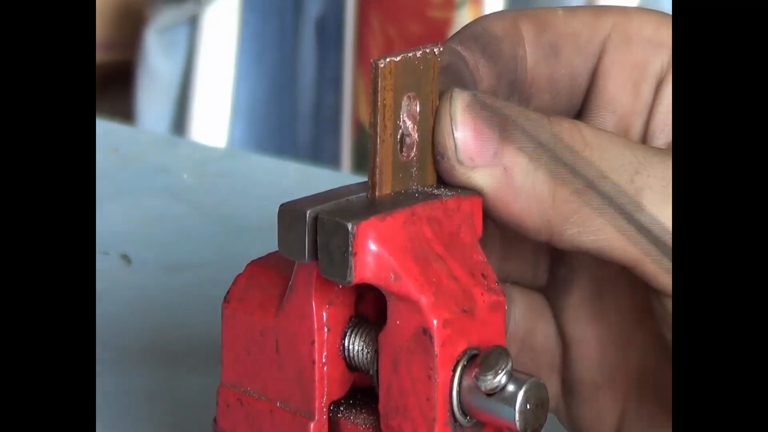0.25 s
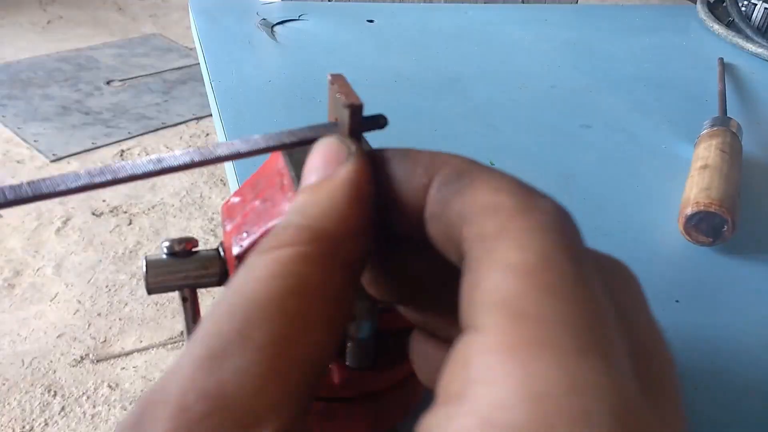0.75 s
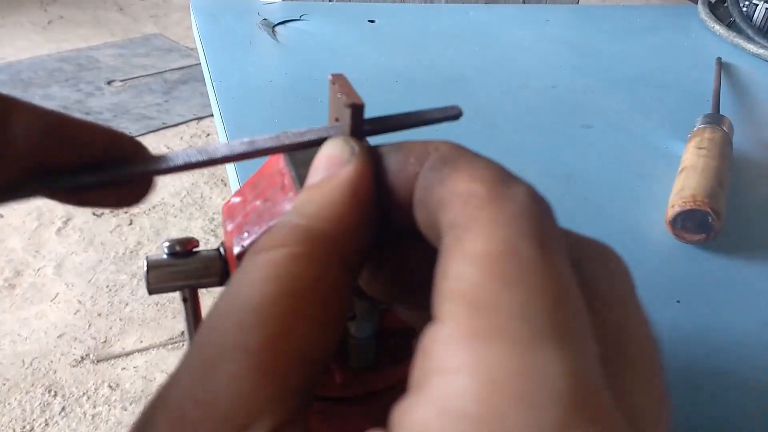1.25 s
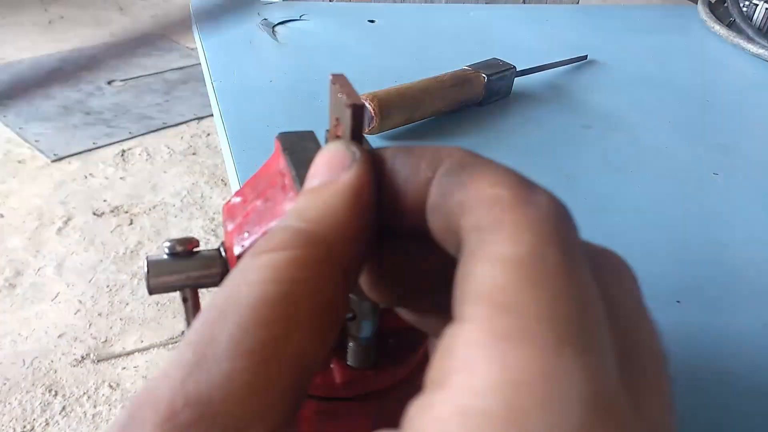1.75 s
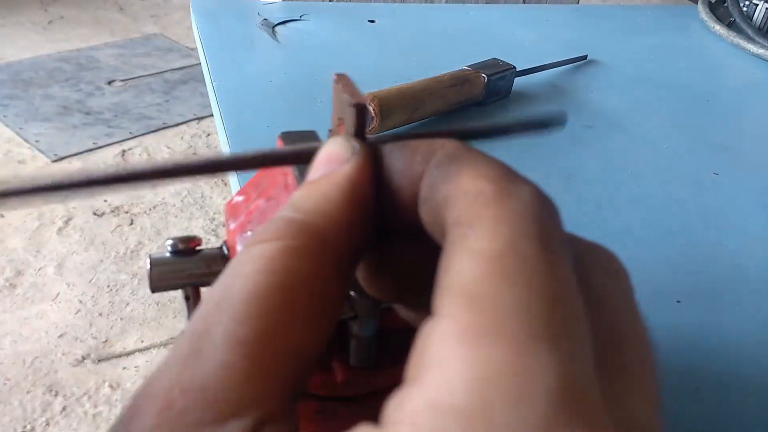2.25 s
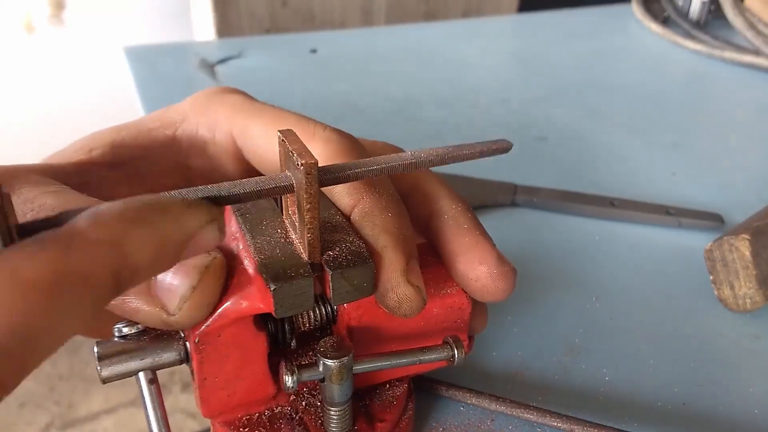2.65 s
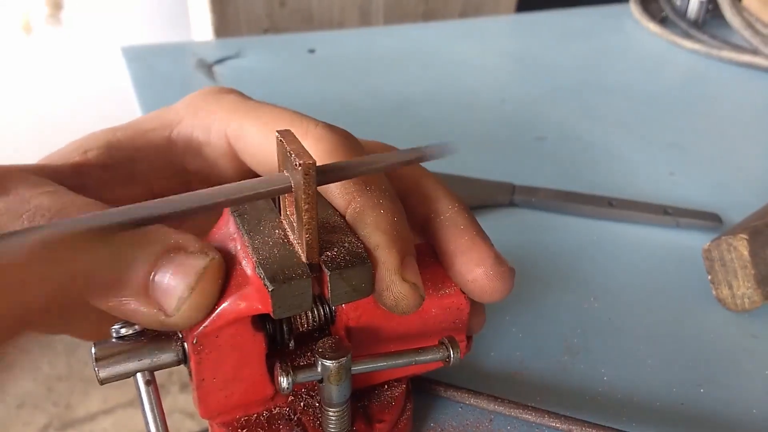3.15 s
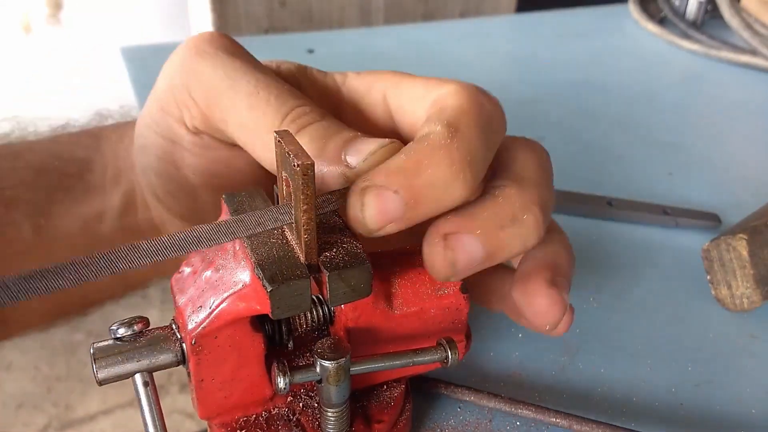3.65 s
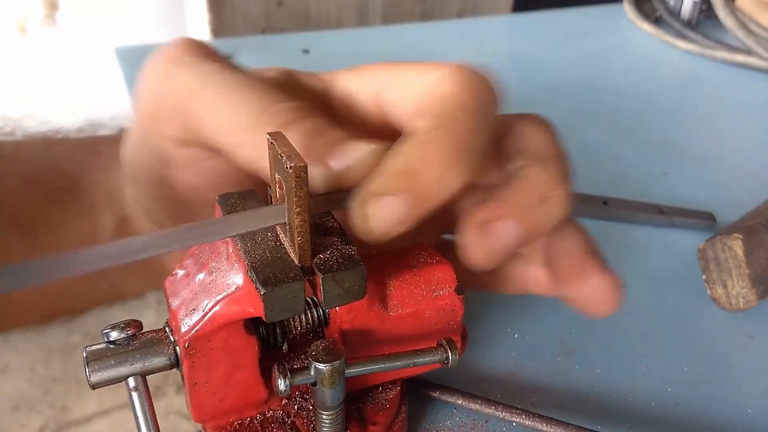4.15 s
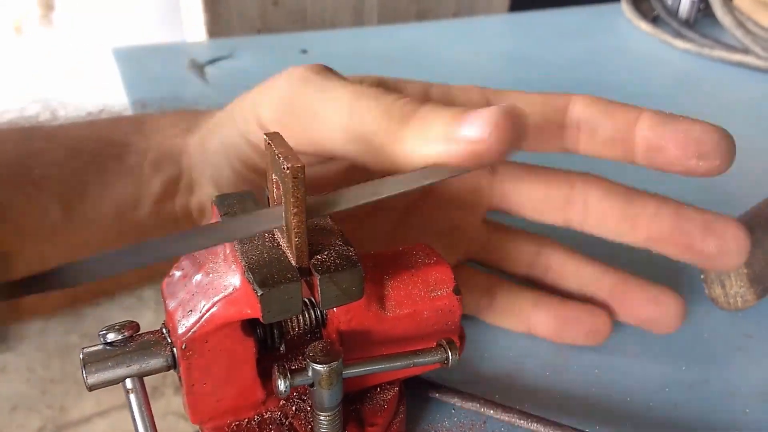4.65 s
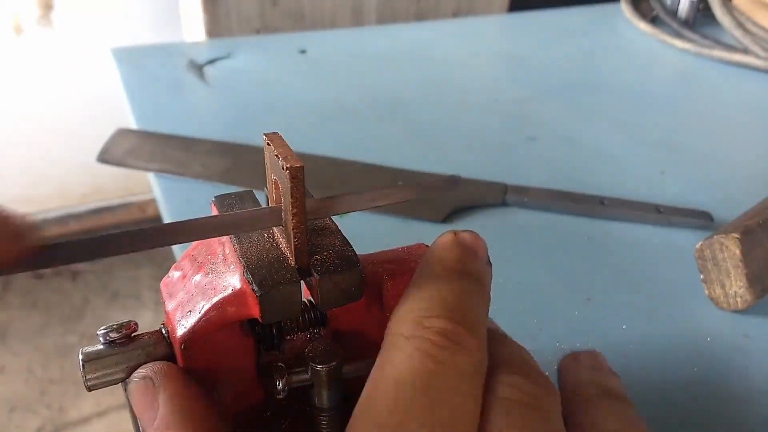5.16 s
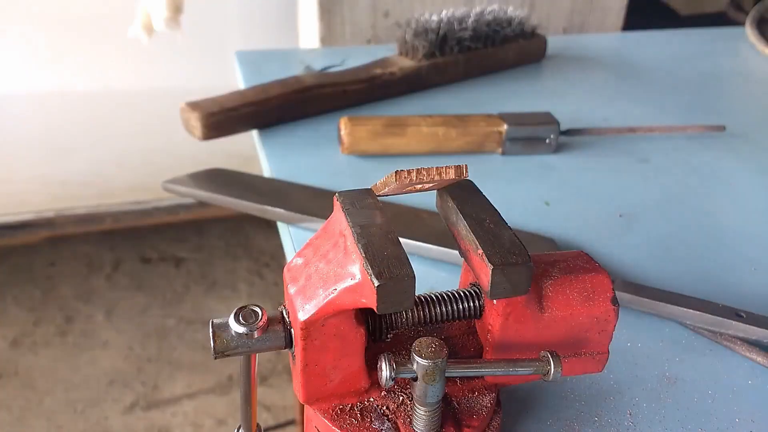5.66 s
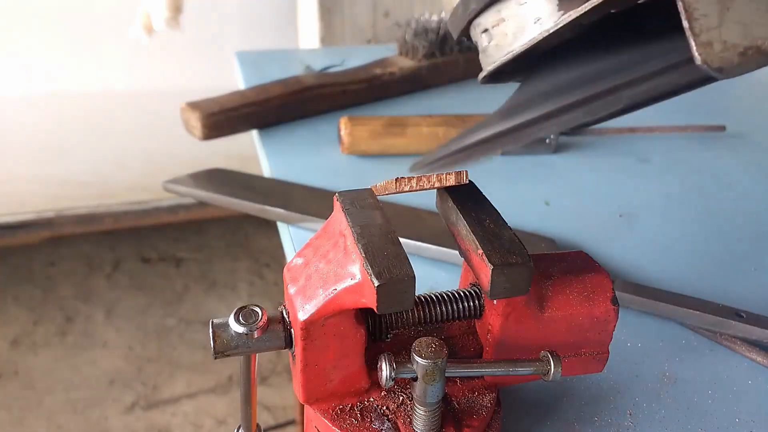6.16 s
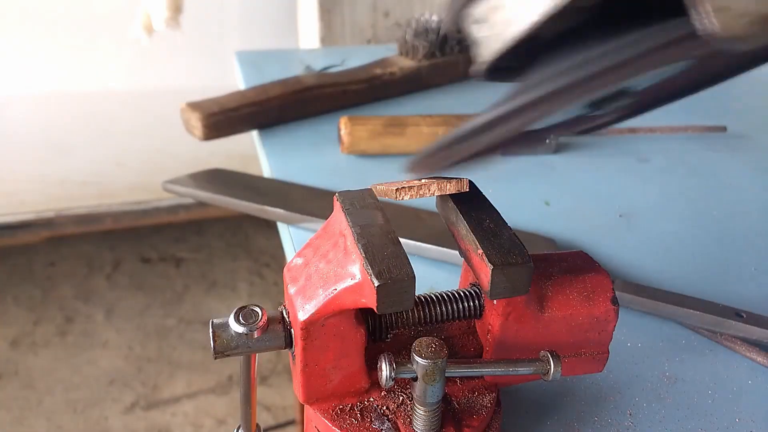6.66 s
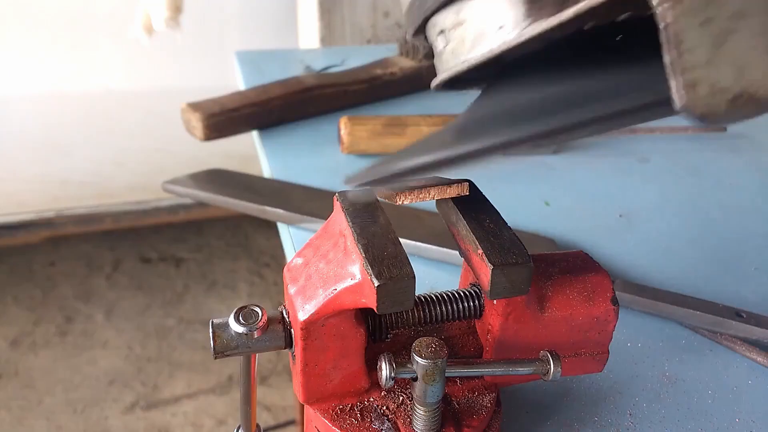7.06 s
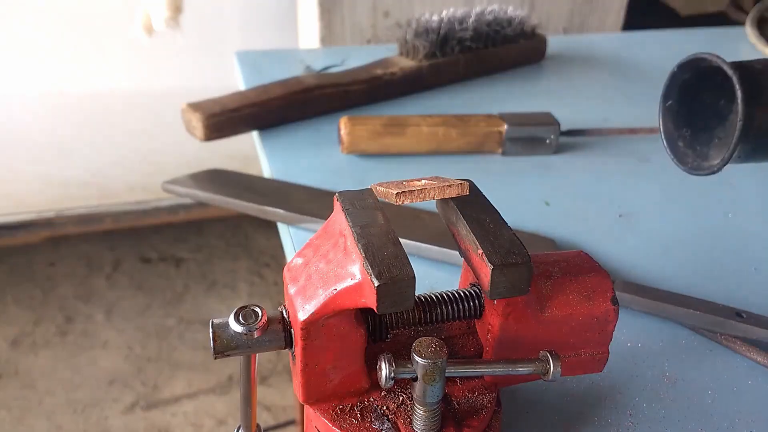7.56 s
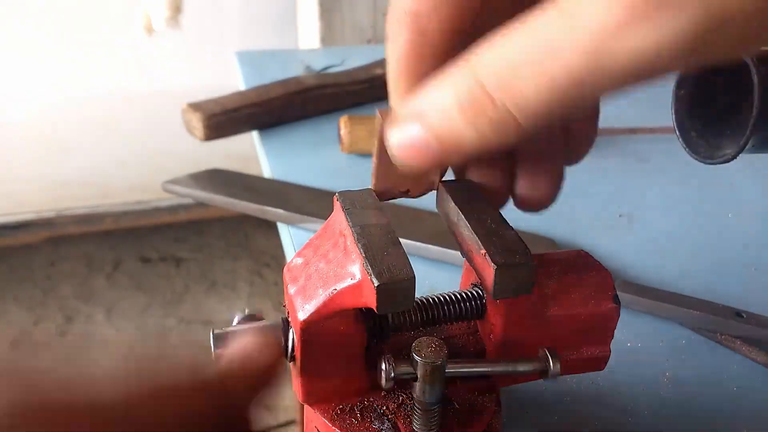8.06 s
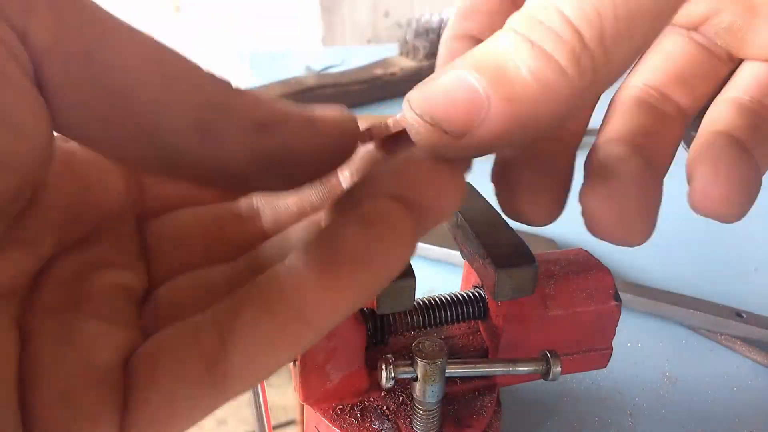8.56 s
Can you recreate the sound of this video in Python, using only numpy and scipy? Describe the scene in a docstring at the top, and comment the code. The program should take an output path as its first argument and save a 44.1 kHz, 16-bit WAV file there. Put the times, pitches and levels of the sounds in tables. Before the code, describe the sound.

Jerky metal filing with chirps and bench knocks, a short pause, then a small vacuum cleaner starts, hisses gritty near the jaws and coasts down.

```python
"""A needle file rasps a small copper piece in a bench vise, with quick jerks, chirping squeals and a shaken bench.
Stick-slip bumps shape noise through the colours of file, fingers and bench; taps and knocks are decaying noise.
A tool is put down. Then a vacuum cleaner's narrow nozzle sucks up the filings, hissing near the jaws, and
the motor runs down: noise gives roar and air, narrow noise bands that follow its speed give hum and whistle."""
import sys
import numpy as np
from scipy import signal
from scipy.fft import rfft, irfft, next_fast_len
from scipy.io import wavfile
from scipy.ndimage import uniform_filter1d, map_coordinates

SR = 44100
rng = np.random.default_rng(int(sys.argv[2]) if len(sys.argv) > 2 else 0)


def output_pcm(signal):
    """Save a mono or channel-first signal as 16-bit PCM at the path in sys.argv[1].

    Samples are clipped to [-1, 1] before scaling.
    """
    pcm = np.clip(np.atleast_2d(signal).T, -1, 1) * 32767
    wavfile.write(sys.argv[1], SR, np.round(pcm).astype(np.int16))


N = 388521

# strokes of the file, from first jerk to last; levels are relative, growth is over the stroke:
# start_s [s], end_s [s], pressure [light or hard], drag_db [dB], bite_db [dB], growth_db [dB]
FILE_STROKES = [(0, 0.114, "light", -25, -30, 0.5), (0.401, 0.471, "light", -34, -48.5, 0),
                (0.738, 0.787, "light", -48.5, -61.5, 9), (0.927, 1.04, "light", -40, -36.5, -2.5),
                (1.162, 1.208, "light", -46, -44, -15), (2.156, 2.245, "light", -50, -58, -13),
                (2.328, 2.359, "light", -40.5, -59, 7.5), (2.417, 2.608, "hard", -41.5, -37.5, 1),
                (2.682, 2.972, "light", -42, -43.5, 0.5), (3.008, 3.084, "light", -45, -48.5, -6),
                (3.13, 3.308, "hard", -41.5, -39.5, 13), (3.465, 3.554, "light", -52.5, -68.5, -8),
                (3.638, 3.674, "light", -37, -43.5, -5.5), (3.787, 3.818, "light", -42, -42.5, -1.5),
                (3.873, 4.192, "hard", -38, -36.5, 0), (4.245, 4.455, "hard", -40, -38, 9),
                (4.496, 4.822, "hard", -39, -37.5, -1), (4.85, 4.887, "light", -37.5, -48.5, -23),
                (4.917, 5.155, "light", -59.5, -66.5, -8.5), (5.201, 5.391, "light", -42.5, -50, 10),
                (5.424, 5.547, "hard", -37.5, -40.5, -0.5)]
# colour of light, dry filing: pitch_hz [Hz], level_db [dB per Hz, relative]
LIGHT_RASP = [(290, -36.5), (500, -8.5), (1410, -2), (2430, -8.5), (5050, -10), (7670, -3), (10700, -13.5),
              (15500, -24.5)]
# modes of the bench top: pitch_hz [Hz], width_hz [Hz], level_db [dB, relative]
BENCH_MODES = [(82.7, 22.6, 1.5), (111, 47.3, 0.5), (186, 22.3, 4), (226.3, 27.7, -2.5), (350, 76, -6),
               (953, 226, -17.5)]

CLOSE_END_S = 0.52  # until here the filing is heard from close by, brighter, with louder background hiss
PINCH_END_S = 2.28  # until here the fingers damp the piece
MOTOR_ON_S, MOTOR_OFF_S = 5.805, 7.222


def amp(db):
    """Turn decibels into gain."""
    return 10 ** (np.asarray(db) / 20)


def unit(x):
    """Scale a stereo pair so that its middle has rms 1."""
    return x / np.sqrt(np.mean(x.mean(0) ** 2) + 1e-20)


def clock():
    """The time of every sample in seconds."""
    return np.arange(N) / SR


def along(points, hz):
    """Interpolate (Hz, value) points on a log frequency axis."""
    f, v = np.transpose(points)
    return np.interp(np.log(hz + 1), np.log(f + 1), v)


def gate(start, end, edge=0.0089):
    """1 between two times; each ramp reaches edge seconds to either side."""
    return np.interp(clock(), [start - edge, start + edge, max(end - edge, start + edge), end + edge], [0, 1, 1, 0])


def wobble(rate):
    """A smooth random curve, rate knots a second."""
    return map_coordinates(rng.standard_normal(int(N * rate / SR) + 4), [np.arange(N) * rate / SR])


def filtered(x, response):
    """Shape x with a response of frequency."""
    size = next_fast_len(N + SR // 2)
    return irfft(rfft(x, size) * response(np.fft.rfftfreq(size, 1 / SR)), size)[..., :N]


def ports(hz):
    """Two microphone ports hear the vise with different colours, at constant total power."""
    # left minus right: pitch_hz [Hz], difference_db [dB]
    port_balance = [(80, -1), (250, 10.5), (1290, 2), (4400, -2.5), (6200, -10), (8000, -20.5), (11500, 1)]
    pair = amp(np.array([.5, -.5])[:, None] * along(port_balance, hz))
    return pair / np.linalg.norm(pair, axis=0)


def white():
    """Independent white noise left and right."""
    return rng.standard_normal((2, N))


def coloured(x, spectrum, placed=True):
    """Give x a spectrum at rms 1; placed sounds take the colour of the ports."""
    return unit(filtered(x, lambda hz: amp(along(spectrum, hz)) * (ports(hz) if placed else 1)))


def resonances(modes, f):
    """The summed response of a few damped modes, with alternating signs."""
    total = 0
    for k, (centre, width, db) in enumerate(modes):
        mode = 1j * f * width / (centre * centre - f * f + 1j * f * width)
        total = total + (-1) ** k * amp(db) * mode
    return total


def ringing(x, modes):
    """Ring damped modes with x, at rms 1."""
    return unit(filtered(x, lambda f: resonances(modes, f)))


def narrow(centre_hz, width_hz):
    """Noise in one band, steady or moving: two slow noises modulate a sine and a cosine."""
    a, b = filtered(np.array([white(), white()]), lambda hz: 1 / (1 + (hz / width_hz) ** 2))
    phase = 2 * np.pi * np.cumsum(centre_hz * np.ones(N)) / SR
    return unit(a * np.cos(phase) + b * np.sin(phase))


def patchy(x, depth_db):
    """Random patches of gain over frequency and time."""
    z = signal.stft(x, nperseg=512)[2]
    field = rng.standard_normal(z.shape[1:])
    field = uniform_filter1d(uniform_filter1d(field, size=4, axis=0), size=5, axis=1)
    return signal.istft(z * amp(depth_db * field / field.std()), nperseg=512)[1][:, :N]


def blows(rows, t60):
    """The envelope of sudden blows (s, dB) that fall by 60 dB in t60 seconds."""
    out, age = np.zeros(N), clock()[:SR // 10]
    for s, db in rows:
        # 2.5 dB partly makes up for the soft attack
        out[int(s * SR):][:len(age)] += amp(db + 2.5 - 60 * age / t60) * (1 - np.exp(-age / 0.002))
    return out


def bumps(rows, half_width_s=.0104):
    """The envelope of short, rounded jerks (s, dB)."""
    out, t = np.zeros(N), clock()
    for s, db in rows:
        near = slice(max(int(s * SR) - SR // 20, 0), int(s * SR) + SR // 20)
        out[near] += amp(db) * np.exp(-((t[near] - s) / half_width_s) ** 2)
    return out


def background():
    """Quiet noise of the room, softer from 5.1 s, with a louder hiss in the opening."""
    # colour of the room: pitch_hz [Hz], level_db [dB per Hz, relative]
    room_colour = [(25, 4.5), (709, -11.5), (1760, -19.5), (6900, -24), (15000, -35)]
    hiss = unit(filtered(white(), lambda hz: (1 + hz / 700) ** -.9))
    room_db = -67.5 - 5.5 * gate(5.1, 10) + 1.6 * wobble(1.8)
    room = amp(room_db) * coloured(white(), room_colour, placed=False)
    return room + amp(-51.0) * gate(-1, CLOSE_END_S) * hiss


def jerks():
    """The file sticks and slips at a nearly steady pace; pressed hard it is slower and bites deep every second time."""
    # the file snags on an edge: time_s [s], level_db [dB, relative]
    snag_events = [(.085, -33), (.113, -30.5), (.146, -29), (.177, -23.5), (.446, -36), (.507, -31),
                   (.857, -34.5), (.96, -29.5), (1.161, -35), (1.252, -43.5), (1.402, -32), (2.316, -32),
                   (2.479, -39), (2.759, -37), (3.064, -31.5), (3.274, -33.5), (4.06, -33.5), (4.852, -37),
                   (5.001, -49)]
    scatter_s, scatter_db = .001, 1.3  # chance in the time and depth of a jerk
    rows = []
    for first, last, pressure, _, bite_db, growth_db in FILE_STROKES:
        pace_hz, graze_db = (31, 7) if pressure == "hard" else (36, 0)
        count = round((last - first) * pace_hz) + 1
        depth_db = bite_db + growth_db * np.linspace(-.5, .5, count)
        depth_db = depth_db - graze_db * (np.arange(count) % 2)  # every second jerk is shallower
        steady = np.column_stack([np.linspace(first, last, count), depth_db])
        rows += list(steady + rng.standard_normal((count, 2)) * [scatter_s, scatter_db])
    slip = bumps([(s, 0) for s, _ in rows])
    return slip, np.hypot(bumps(rows), bumps(snag_events))


def file_drag():
    """The file drags from just before the first jerk of a stroke to just after its last."""
    lead_s, trail_s = 0.035, 0.0094
    return sum(gate(a - lead_s, b + trail_s) * amp(db) for a, b, _, db, *_ in FILE_STROKES)


def rasp(slip, bite, drag):
    """Teeth tear tiny chips: grainy noise, pushed by drag and bites, rings the file, the vise and the piece."""
    # modes of file and vise: pitch_hz [Hz], width_hz [Hz], level_db [dB, relative]
    steel_modes = [(1790, 82, -8), (2496, 50, -3.5), (4960, 190, -12.5), (6100, 41, 1), (7970, 110, -2),
                   (7400, 30, 2.5), (8220, 85, -4)]
    # modes of the piece damped by the fingers, same columns
    pinched_modes = [(1337, 80, 0), (4460, 110, -10.5), (8390, 73, 0)]
    # broad modes of the filing heard from close by, same columns
    close_modes = [(851, 220, 4), (1440, 270, 2), (3900, 770, -3), (8380, 480, -2)]
    # colour of firm filing: pitch_hz [Hz], level_db [dB per Hz, relative]
    firm_colour = [(240, -17), (400, -16), (1700, -6), (2060, -14), (5390, -12.5), (8150, -3), (15000, -28)]
    scrape = drag * (slip + .6) * amp(-16 + 1.3 * wobble(40))
    force = np.hypot(scrape, bite * amp(-2.3))
    # single teeth bite unevenly, and the colour of the bites keeps changing
    chips = patchy(white() * amp(2 * wobble(1800)), depth_db=3.5)
    ring = ringing(chips, steel_modes)
    firm = amp(-2.5) * coloured(chips, firm_colour) + amp(-9.5) * unit(filtered(ring, ports))
    dry_chips = coloured(chips, LIGHT_RASP, placed=False)
    damped = ringing(white(), pinched_modes)
    near_ring = ringing(white(), close_modes)
    close_view = gate(-1, CLOSE_END_S)
    light = amp(-6.0) * dry_chips + (1 - close_view) * amp(-9.5) * damped + close_view * amp(-3.0) * near_ring
    # from 4.95 s the file is eased off and sounds drier
    easing = gate(4.95, 10)
    firm = firm * amp(-6 * easing) + easing * amp(-9) * dry_chips
    # a very high ring at the start; later the file stays on the verge of a lower squeal
    zing = gate(-1, 0.18) * amp(-2.5) * narrow(11000, width_hz=190)
    chatter = gate(2.39, 3.32) * amp(-8) * narrow(1770, width_hz=60)
    # at first the fingers pinch the piece; later it rings in the vise alone
    pinched = gate(-1, PINCH_END_S)
    return force * (pinched * light + (1 - pinched) * firm + zing + chatter)


def bench_shake(slip, bite, drag):
    """Drag and bites shake the bench: low noise through the held piece and the modes of the bench top."""
    # colour of the bench while the fingers hold the piece: pitch_hz [Hz], level_db [dB per Hz, relative]
    held_colour = [(60, -21), (125, -5.5), (210, 3.5), (350, -9.5), (600, -25), (1500, -49.5)]
    bench = filtered(white(), lambda f: ports(f) * resonances(BENCH_MODES, f) / (1 + (f / 800) ** 2))
    pinched = gate(-1, PINCH_END_S)
    clamped = gate(CLOSE_END_S, 10) * (1 - .6 * pinched)  # share of the bench top's ring that is heard
    body = pinched * coloured(white(), held_colour, placed=False) + clamped * unit(bench)
    shaking = drag * (slip + 0.33) * amp(-3 + 2.6 * wobble(30))
    return body * np.hypot(shaking, bite * amp(-9))


def squeals():
    """Stick-slip locks on to one mode for a short, slightly unsteady chirp that bends down under the load."""
    # chirps: time_s [s], pitch_hz [Hz, at the middle], level_db [dB]
    chirps = [(.029, 8360, -19), (.087, 8450, -24.5), (.114, 10120, -21.5), (0.141, 8300, -13.5),
              (2.48, 1736, -29), (2.546, 1773, -33.5), (2.612, 1785, -33.5), (2.76, 1755, -28),
              (3.07, 1690, -27.5), (3.19, 1720, -39), (3.279, 1790, -36), (5.002, 4280, -51),
              (5.421, 8290, -36), (5.483, 8280, -30.5), (5.543, 8300, -18.5)]
    half_length_s, sag_hz_per_s = 0.01, 2647
    out = np.zeros((2, N))
    drift = 1 + 0.005 * wobble(460)
    flutter = amp(1.5 * wobble(400))
    for s, hz, db in chirps:
        near = abs(clock() - s) < 1 / 20
        t = clock()[near] - s
        phase = 2 * np.pi * np.cumsum(hz * drift[near] - sag_hz_per_s * t) / SR
        # chirps heard from close by stay in the middle
        side = ports(np.array([hz])) if s > CLOSE_END_S else np.ones((2, 1))
        envelope = amp(db) * np.exp(-(t / half_length_s) ** 2) * flutter[near]
        out[:, near] += side / side.mean() * envelope * np.sin(phase)
    return out


def knocks():
    """Dull blows on the bench: dark noise that dies quickly."""
    # blows: time_s [s], level_db [dB, relative]
    bench_blows = [(0.502, -25.5), (1.394, -44), (1.669, -28), (1.696, -32), (1.72, -26), (5.712, -58),
                   (7.457, -35.5)]
    # colour of a blow: pitch_hz [Hz], level_db [dB per Hz, relative]
    thud_colour = [(50, -21.5), (190, -2), (700, -11.5), (1200, -21), (3200, -29.5), (14000, -43.5)]
    return blows(bench_blows, t60=0.062) * coloured(white(), thud_colour, placed=False)


def taps():
    """The file taps the piece: very short bursts of dry filing noise."""
    # taps: time_s [s], level_db [dB, relative]
    tap_events = [(.516, -19), (1.294, -51), (1.842, -52), (1.925, -43)]
    return blows(tap_events, t60=0.016) * coloured(white(), LIGHT_RASP, placed=False)


def thumps():
    """The file jolts the vise, and each impulse kicks the low modes of the bench top."""
    # jolts: time_s [s], level_db [dB; the loudest sets the peak]
    jolt_events = [(.737, -39.5), (2.201, -37.5), (3.783, -32.5), (4.052, -31.5), (4.116, -29),
                   (4.492, -31), (4.786, -30)]
    kicks = np.zeros(N)
    for s, db in jolt_events:
        kicks[int(s * SR)] = amp(db)
    ring = filtered(kicks, lambda f: ports(f) * resonances(BENCH_MODES, f) / (1 + 1j * f / 400))
    return ring * kicks.max() / abs(ring.mean(0)).max()


def motor():
    """The motor spins up, runs and coasts down exponentially: spin-up lag, coasting time, share of full speed."""
    start_speed, spin_up_s, coast_s = 0.55, .17, .6  # share of full speed; time constants
    coasting = np.maximum(clock() - MOTOR_OFF_S, 0)
    lag = np.exp(-np.maximum(clock() - MOTOR_ON_S, 0) / spin_up_s)
    rundown = np.exp(-coasting / coast_s)
    return lag, coasting, rundown, (1 - (1 - start_speed) * lag) * rundown


def hose_roar(lag, coasting, fading_s):
    """Air roars down the hose as broad noise, and the hose modes join as the motor spins up."""
    # colour of the roar: pitch_hz [Hz], level_db [dB per Hz, relative]
    hose_colour = [(30, -23.5), (150, -13), (450, 1.5), (5500, -11.5), (9000, -29.5)]
    # modes of the hose: pitch_hz [Hz], width_hz [Hz], level_db [dB, relative]
    pipe_modes = [(90, 30, 4), (265, 70, 4), (478, 30, 6), (802, 50, 6.5), (1260, 200, 4.5),
                  (2170, 170, 1.5)]
    roar_db = -47.5 + 0.5 * lag - 5 * coasting - 65.965 * fading_s
    pipe = amp(-1.5) * (1 - lag) ** 2 * ringing(white(), pipe_modes)
    return amp(roar_db + wobble(25)) * (amp(-5) * coloured(white(), hose_colour) + pipe)


def gulp():
    """The first gulp of air rings the hose: a narrow band that dies away."""
    decay_s = 0.023
    running = np.maximum(clock() - MOTOR_ON_S, 0)
    return amp(-39) * np.exp(-running / decay_s) * narrow(800, width_hz=51)


def motor_hum(lag, speed):
    """Narrow bands follow the motor speed: the hum, half its pitch, and its third harmonic when coasting starts."""
    hum_hz = 305.5 * speed
    low = speed * (amp(-18) * narrow(hum_hz, width_hz=10) + amp(-27) * narrow(hum_hz / 2, width_hz=10))
    third = amp(-15) * (1 - lag) * gate(MOTOR_OFF_S, 7.5, edge=.1) * narrow(3 * hum_hz, width_hz=50)
    # the half-blocked nozzle adds a second hum
    choked = amp(-15.5) * gate(6.15, 6.8, edge=.06) * narrow(422, width_hz=10)
    return low + third + choked


def nozzle_rush(lag, coasting, rundown, speed, fading_s):
    """Air rushes into the nozzle: patchy noise, a whistle and a whine that follow the speed, and a fixed ring."""
    # colour of the rushing air: pitch_hz [Hz], level_db [dB per Hz, relative]
    air_colour = [(880, -52.5), (1500, -12.5), (2300, -5), (4300, -6), (7230, -8), (8790, -4),
                  (15500, -25.5)]
    # the falling rush swells: start_s [s], end_s [s], rise_db [dB]
    rush_swells = [(7.722, 7.809, 4), (7.855, 8.01, 5.5)]
    rush_db = -32.5 - 7.5 * lag - 29 * coasting - 16.59 * fading_s
    rush_db = rush_db + sum(db * gate(a, b) for a, b, db in rush_swells)
    eddies = patchy(white(), depth_db=1.4) * amp(2.4 * wobble(1500))
    whistle = amp(-6.5) * speed ** .5 * (1 + lag ** 2) * narrow(3151 * speed ** .8, width_hz=420)
    nozzle_ring = amp(-11) * (1 + lag) * rundown * narrow(5674, width_hz=150)
    whine = amp(-12) * gate(7.33, 7.76, edge=.07) * narrow(8020 * speed, width_hz=20)
    air = coloured(eddies, air_colour) + whistle + nozzle_ring + whine
    return amp(rush_db + wobble(30)) * (air + motor_hum(lag, speed))


def jaw_hiss():
    """Air squeezed past the jaw hisses grittily, and the half-blocked opening churns the air in the hose."""
    # passes by the jaw: start_s [s], end_s [s], level_db [dB, relative]
    jaw_passes = [(6.094, 6.804, -22), (6.862, 6.974, -23.5), (7.039, 7.155, -20.5)]
    # colour of the squeezed air: pitch_hz [Hz], level_db [dB per Hz, relative]
    edge_colour = [(1470, -39.5), (2500, -7), (3050, -8.5), (4360, -9.5), (8420, 3), (10900, -9),
                   (15000, -9)]
    near_jaw = sum(gate(a, b) * amp(db) for a, b, db in jaw_passes) * amp(wobble(60))
    hiss = coloured(patchy(white() * amp(1.7 * wobble(2000)), depth_db=2.2), edge_colour)
    churn = unit(filtered(white(), lambda hz: hz / (hz + 40) / (1 + (hz / 1500) ** 2)))
    return near_jaw * (hiss + amp(-19.5) * churn)


def puff():
    """A low puff of noise as the nozzle pulls away."""
    return unit(filtered(white(), lambda hz: 1 / (1 + (hz / 60) ** 2))) * bumps([(7.147, -40)])


def vacuum():
    """Spin-up and coasting shape the roar in the hose and the rush at the nozzle; hiss and puff come on top."""
    lag, coasting, rundown, speed = motor()
    fading_s = np.maximum(clock() - 8.21, 0)  # from 8.21 s the vacuum sound fades out faster
    flow = hose_roar(lag, coasting, fading_s) + gulp()
    flow = flow + nozzle_rush(lag, coasting, rundown, speed, fading_s)
    return gate(MOTOR_ON_S, 10) * flow + jaw_hiss() + puff()


def tick():
    """The copper piece touches the jaw: one bright, quickly dying sine."""
    return blows([(8.172, -27)], t60=0.039) * np.sin(2 * np.pi * 10100 * clock())


def workshop(x, t60, wet_db):
    """A faint, short answer from the walls: decaying noise as an echo tail."""
    t = np.arange(SR // 2) / SR
    tail = rng.standard_normal((2, len(t))) * amp(-60 * t / t60) * (t > .004)
    return x + amp(wet_db) * signal.fftconvolve(x, tail / np.linalg.norm(tail[0]), axes=1)[:, :N]


def scene():
    """File and bench sound in the workshop; squeals, vacuum and background are added without its echo."""
    slip, bite = jerks()
    drag = file_drag()
    filing = rasp(slip, bite, drag) + bench_shake(slip, bite, drag)
    at_bench = filing + knocks() + taps() + thumps() + tick()
    return background() + workshop(at_bench, t60=0.12, wet_db=-21) + squeals() + vacuum()


def record(dry):
    """A steep low-pass leaves almost nothing above 15.7 kHz."""
    return filtered(dry, lambda hz: 1 / (1 + (hz / 15700) ** 200))


dry = scene()
out = record(dry)
output_pcm(out)
```